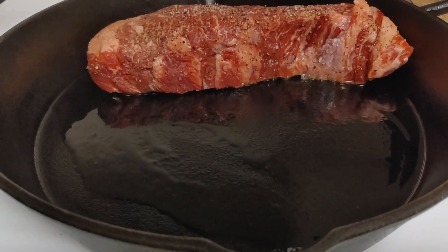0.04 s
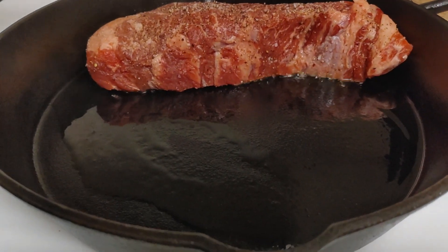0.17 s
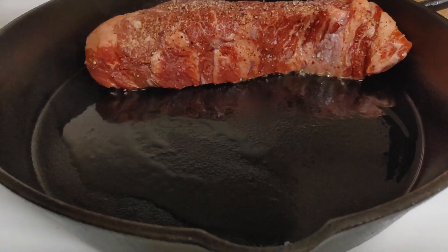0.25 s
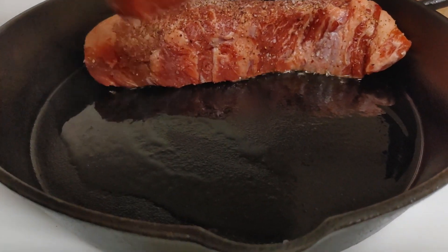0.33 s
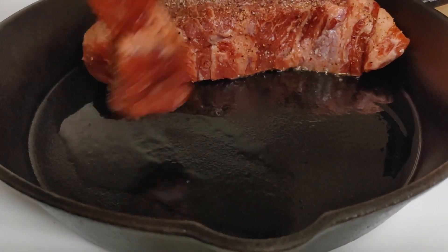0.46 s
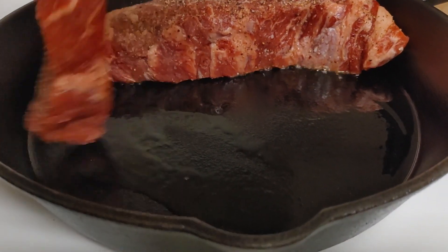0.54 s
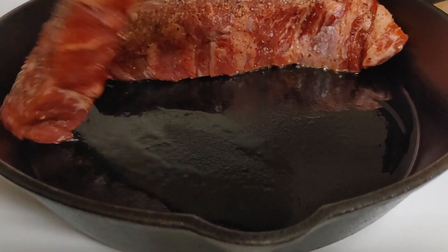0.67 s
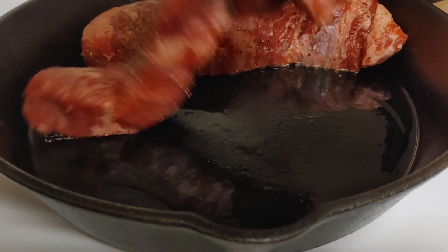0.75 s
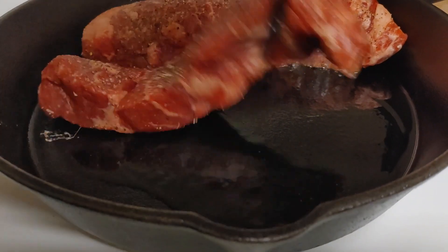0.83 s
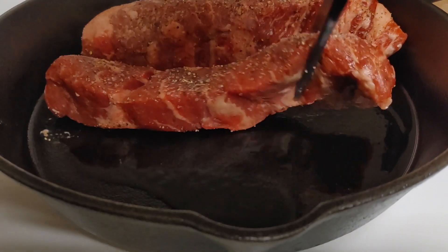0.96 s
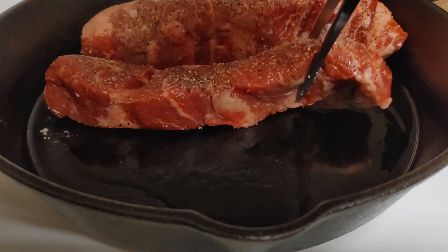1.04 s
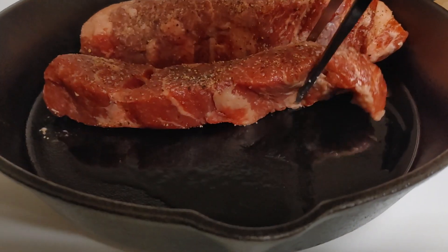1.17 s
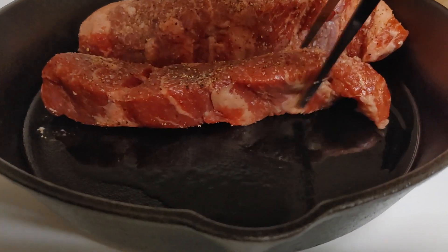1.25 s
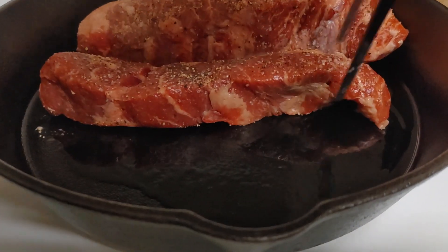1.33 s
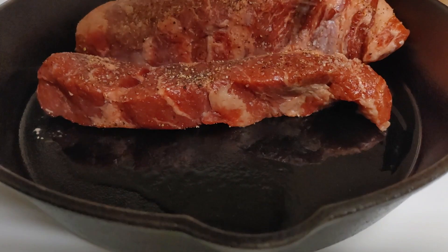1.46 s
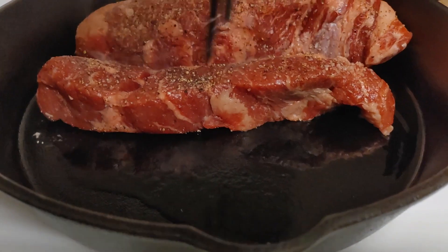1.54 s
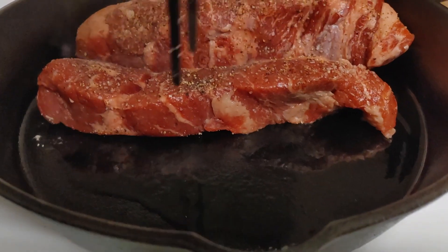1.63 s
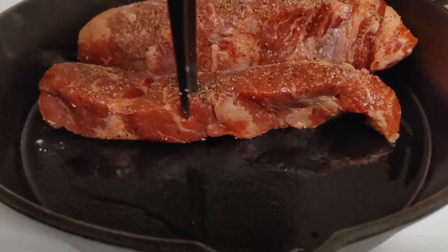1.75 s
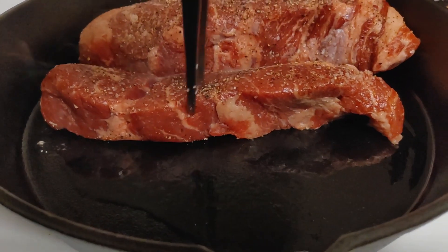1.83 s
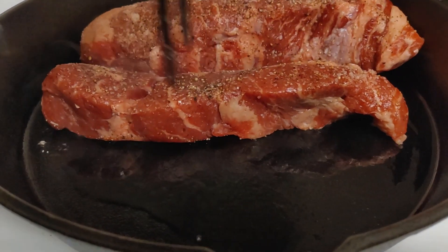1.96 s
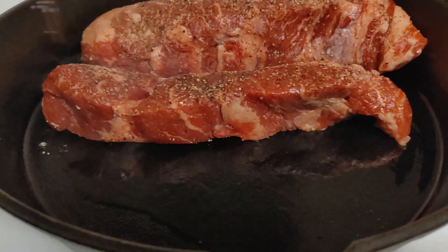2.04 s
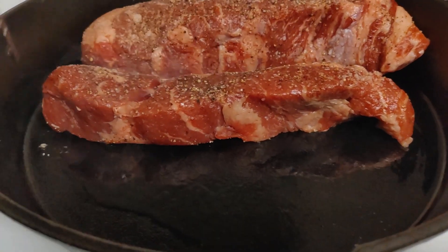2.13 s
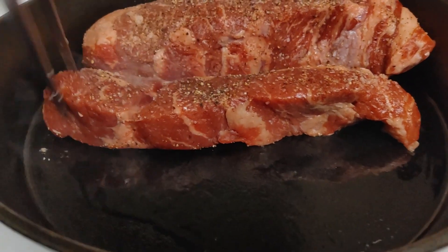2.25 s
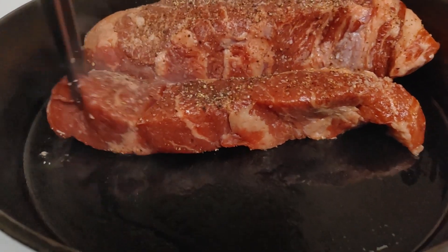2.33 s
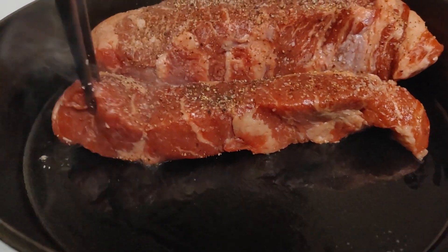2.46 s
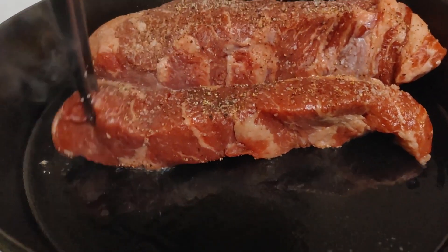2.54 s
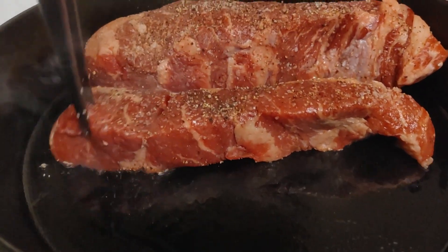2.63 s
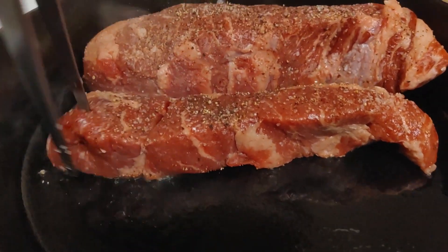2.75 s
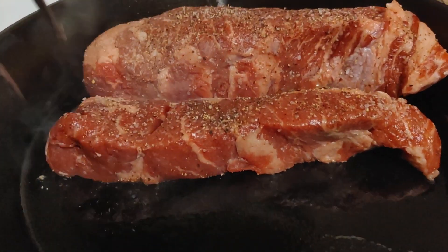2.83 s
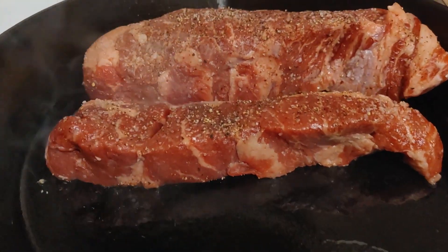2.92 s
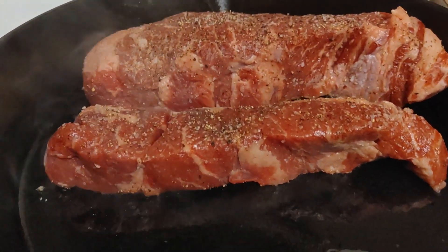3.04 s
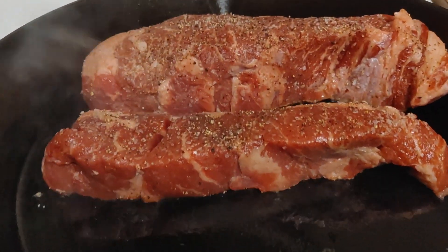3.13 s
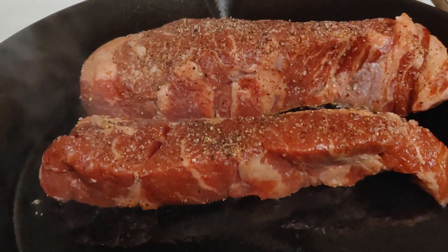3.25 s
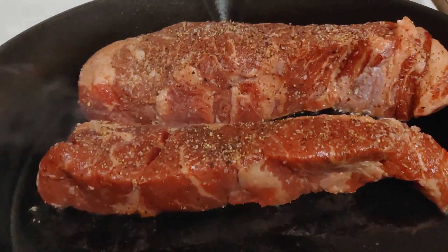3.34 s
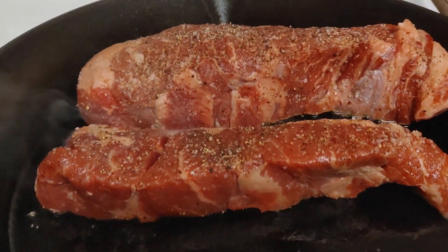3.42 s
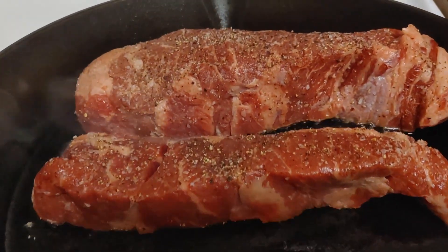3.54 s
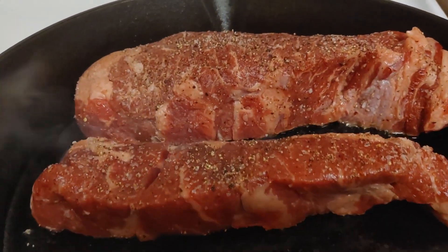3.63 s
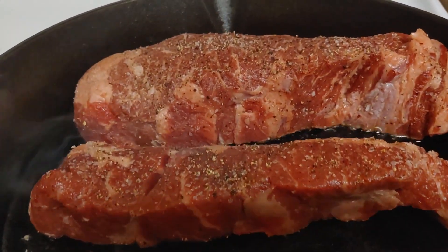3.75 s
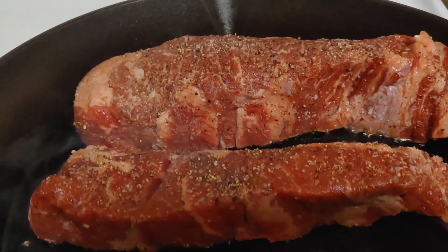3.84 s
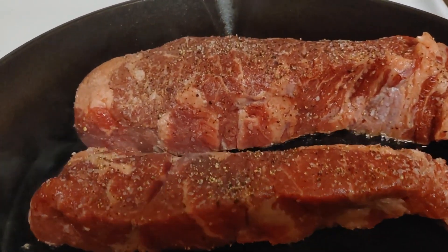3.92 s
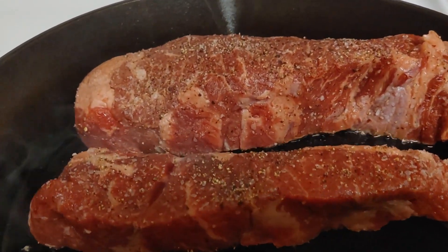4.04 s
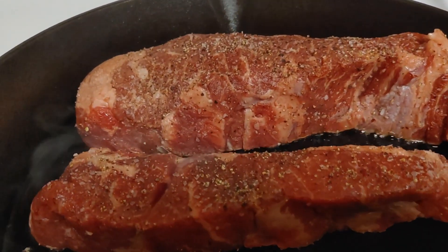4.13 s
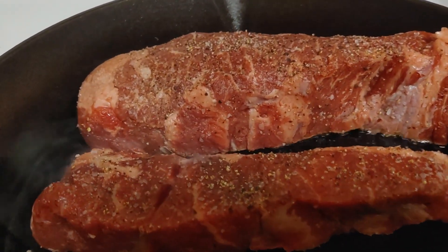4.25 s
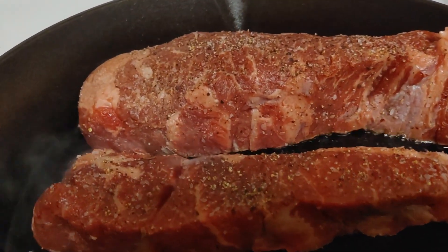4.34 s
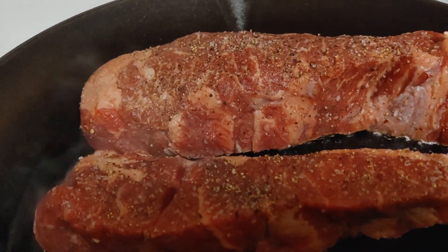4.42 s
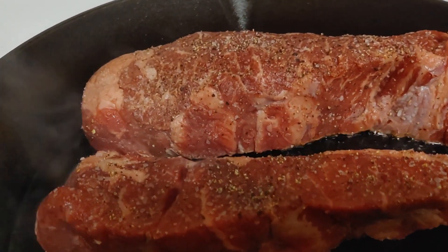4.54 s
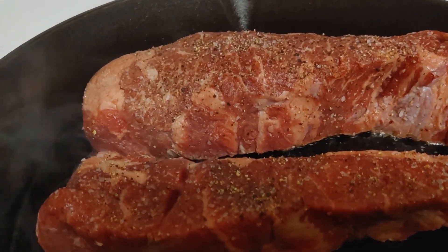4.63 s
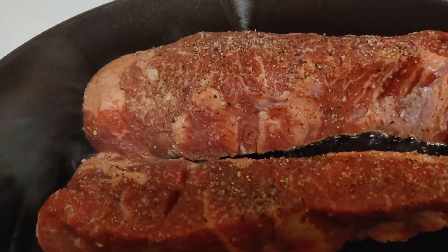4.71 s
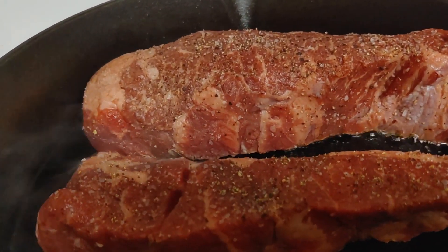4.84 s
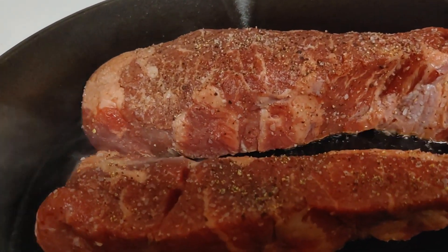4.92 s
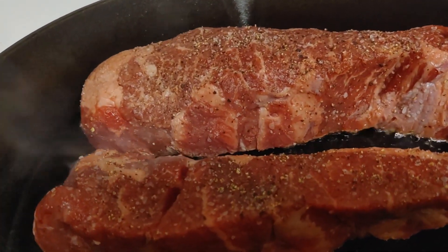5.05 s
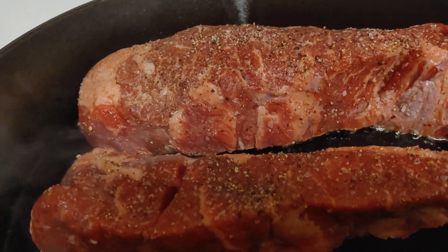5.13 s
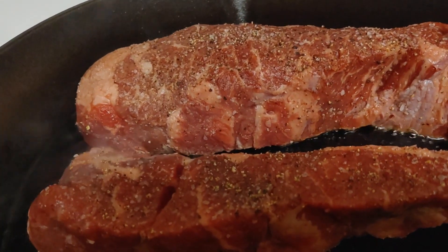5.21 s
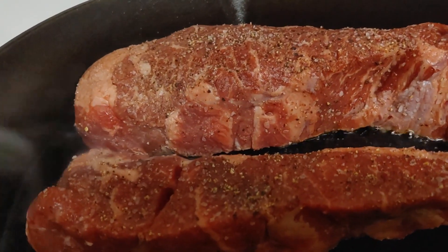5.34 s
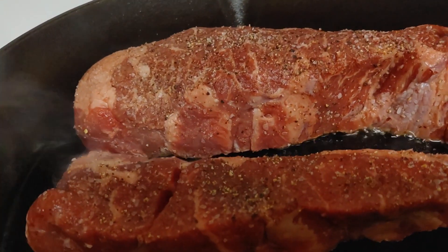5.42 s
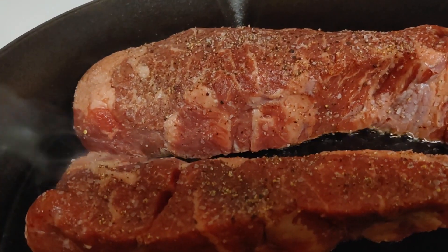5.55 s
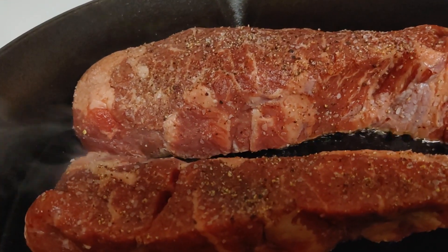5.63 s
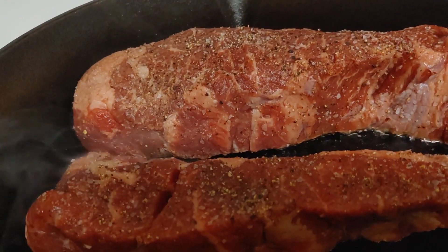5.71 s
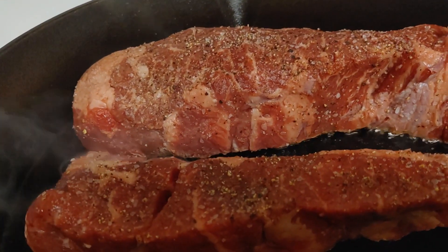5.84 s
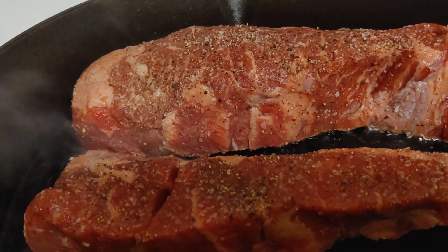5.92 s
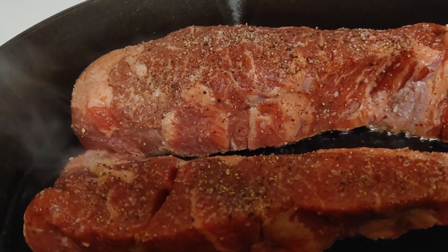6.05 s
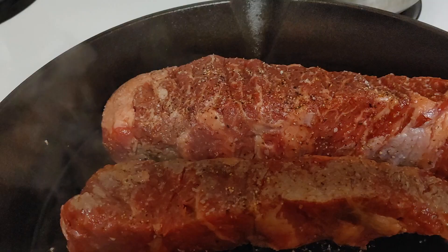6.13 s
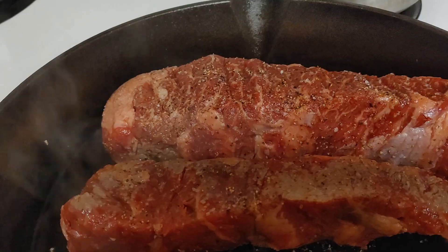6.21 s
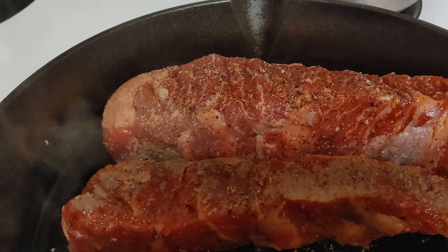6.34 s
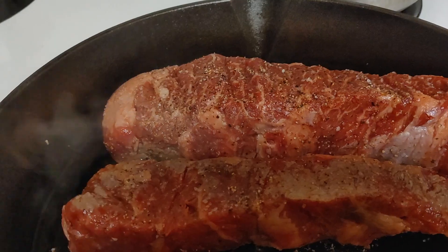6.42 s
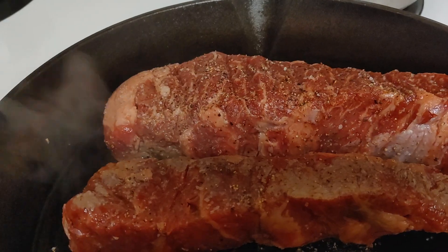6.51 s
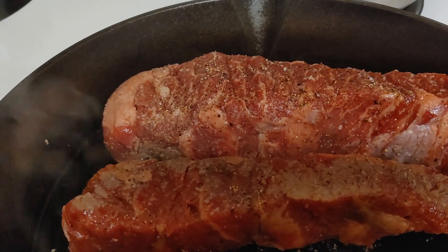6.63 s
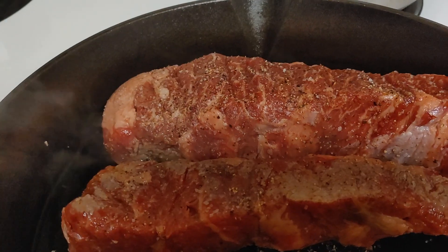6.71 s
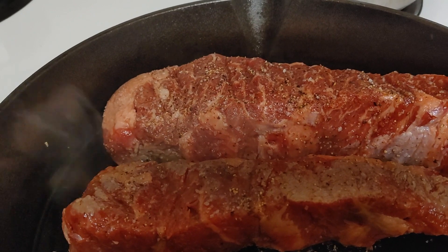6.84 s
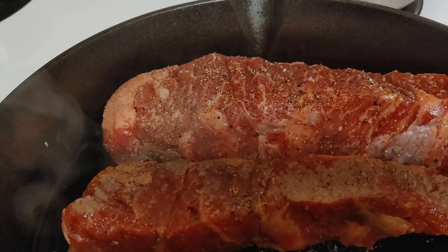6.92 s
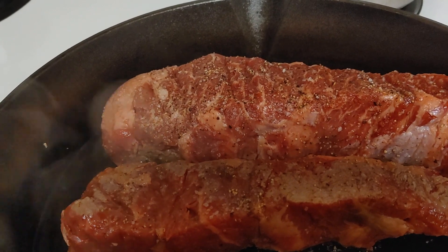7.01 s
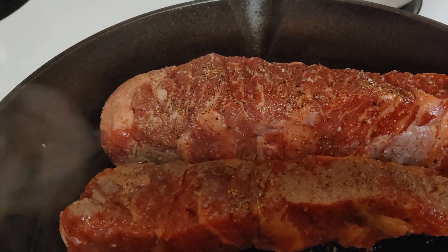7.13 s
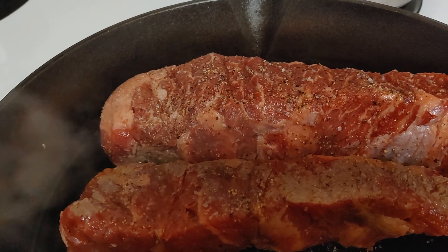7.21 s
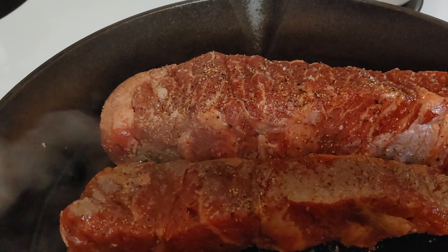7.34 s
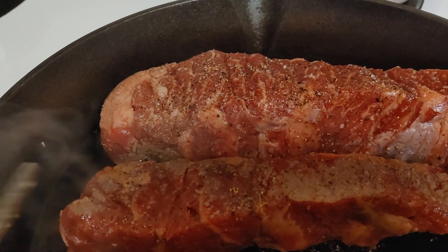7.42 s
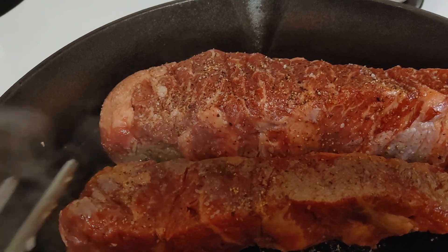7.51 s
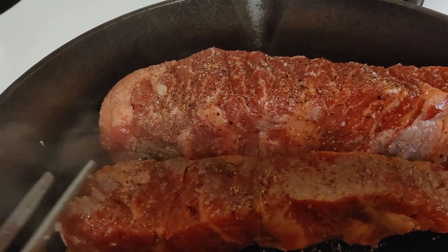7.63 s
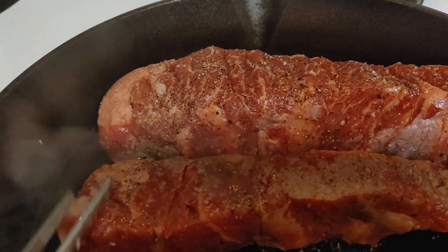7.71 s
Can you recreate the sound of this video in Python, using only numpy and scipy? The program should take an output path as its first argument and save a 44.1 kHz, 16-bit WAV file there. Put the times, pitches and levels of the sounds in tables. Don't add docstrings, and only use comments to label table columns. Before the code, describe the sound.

Close stereo sound of meat frying in an iron pan. A moderate, bright hiss swells within about a second as a second strip touches the oil, then stays dense and loud with sharp snaps, spits and soft low thumps jumping between left and right. Just after six seconds it stops abruptly, and a much quieter, coarser sizzle follows with small crackles. Faint kitchen rumble lies beneath.

```python
import sys
import numpy as np
from scipy import signal
from scipy.fft import rfft, irfft, next_fast_len
from scipy.io import wavfile
from scipy.ndimage import uniform_filter1d, minimum_filter1d, map_coordinates

SR = 44100
rng = np.random.default_rng(int(sys.argv[2]) if len(sys.argv) > 2 else 0)


def wav_record(signal):
    frames = np.transpose(np.atleast_2d(signal))
    bounded = np.clip(frames, -1, 1)
    quanta = np.round(bounded * 32767).astype(np.int16)
    wavfile.write(sys.argv[1], SR, quanta)


def voltage_ratio(decibels):
    exponent = np.asarray(decibels, float) / 20
    return 10 ** exponent


N = 342651
NOW = np.arange(N) / SR
RESUME_S = 6.2318

# (time [s], vigour [dB], coarseness [dB], place left-right [dB])
BOIL = [(0, -26, -0.5, -1.5), (.74, -25.5, -1, -3.5), (.93, -23.5, 1, -2), (1.1, -20.5, -2.5, -1.5),
        (1.3, -19, -1.5, -2), (1.55, -18.5, -2, -1), (1.85, -17.5, -1, -1), (2.2, -18, -0.5, -2.5),
        (2.8, -18, -0.5, -2.5), (3.25, -19, 0, -2.5), (4.0, -19.5, 0.5, -3.5), (4.8, -20, 1.5, -4),
        (6.16, -20, 0, -3), (6.24, -37, 1.5, -0.5), (6.41, -30, 2, .5), (6.7, -31, 1, 0),
        (7.0, -31, 4, -1.5), (7.77, -31.5, 5.5, -1.5)]


def oil():
    # (frequency [Hz], level per Hz [dB])
    fizz_tone = [(3000, -37), (5000, -15), (6000, -3.5), (7000, -2.5), (8600, -1), (9700, -4.5),
                 (11600, -0.5), (12400, -4.5), (12900, -4), (14000, -4.5), (15800, -7), (16000, -78)]
    sputter_tone = [(1200, -54), (2100, -15), (2800, -4), (3500, -4), (3850, -0.5), (4400, -1.5),
                    (5300, -5), (6200, -12.5), (8000, -16)]
    burble_tone = [(25, -58), (120, -41), (200, -22.5), (350, -21), (550, -8), (1000, -3.5), (1450, -1),
                   (1900, -5.5), (2500, -4), (4000, -50)]
    # (frequency [Hz], gain [dB])
    calm_tone = [(200, 3), (450, -8.5), (800, -2), (1300, 2), (2000, 3)]
    touch_s, touch_length_s = 0.85, 0.1
    fresh_db, fresh_s = 3, 0.35

    vigour_db, coarse_db, place_db = curves(BOIL)
    fine = bursting(count=9000, spread_db=0.5, life_s=0.00022)
    coarse = bursting(count=2500, spread_db=2, life_s=0.00082)
    spit = bursting(count=700, spread_db=1.5, life_s=0.0005)

    fizz = sizzle(fizz_tone, 0.85 * fine + 0.15 * spit, share=0.2, patchy_db=0.47, own_db=-0.5)
    fizz = lean(place_db + 1.4) * fizz

    sputter = sizzle(sputter_tone, (fine + coarse + spit) / 3, share=0.27, patchy_db=0.42, own_db=-1.0)
    sputter = voltage_ratio(-5 + coarse_db + 0.22 * wobble(6.5)) * lean(place_db + 0.04) * sputter

    burble_db = -19 + 0.15 * coarse_db + 7 * (NOW > RESUME_S)
    burble = sizzle(burble_tone, coarse, share=0.26, patchy_db=1.0, own_db=0.85)
    burble = voltage_ratio(burble_db + 0.75 * wobble(6.5)) * burble
    since_touch = NOW - touch_s
    calm = np.clip(1 - since_touch / touch_length_s, 0, 1)
    burble = burble * voltage_ratio(fresh_db * (1 - calm) * np.exp(-since_touch.clip(0) / fresh_s))
    calm_burble = filtered(burble, lambda hz: voltage_ratio(along(calm_tone, hz)))
    burble = burble + calm * (calm_burble - burble)

    surge_db = 0.16 * wobble(14) + 0.31 * wobble(60) + 0.28 * wobble(5.9)
    return voltage_ratio(vigour_db + 0.5 + surge_db) * flares() * (fizz + sputter + burble)


def sizzle(spectrum, bursts, share, patchy_db, own_db):
    # (frequency [Hz], difference [dB])
    side_tilt = [(300, 1), (1300, 1), (2400, 0), (4000, -2), (6000, -1), (8000, -0.5), (12000, 2),
                 (15000, 0.5)]
    # (frequency [Hz], correlation [0-1])
    likeness = [(150, 0.21), (700, 0.95), (1200, 0.52), (2000, 0.3), (4000, 0.19), (12000, 0.051)]
    z = signal.stft(rng.standard_normal((2, N)), nperseg=256)[2]
    patches = uniform_filter1d(rng.standard_normal(z.shape[1:]), 5, 0)
    patches = unit(uniform_filter1d(patches, 5, 1))
    noise = signal.istft(z * voltage_ratio(patchy_db * patches), nperseg=256)[1][:, :N]
    pair = noise * np.sqrt(1 - share + share * bursts)

    def mid_side(hz):
        turn = np.arccos(np.clip(along(likeness, hz), -1, 1)) / 2
        return voltage_ratio(along(spectrum, hz)) * [np.cos(turn), np.sin(turn)]

    mid, side = filtered(pair, mid_side)
    both = filtered(np.array([mid + side, mid - side]), lambda hz: lean(along(side_tilt, hz)))
    return unit(both) * voltage_ratio(own_db * np.array([wobble(25), wobble(25)]))


def bursting(count, spread_db, life_s):
    start = rng.integers(0, N, count)
    power = voltage_ratio(2 * spread_db * rng.exponential(1, count).clip(0, 4))
    t = np.arange(-200, 201) / SR
    burst = np.exp(-2 * np.abs(t) / life_s)
    train = signal.fftconvolve(np.bincount(start, power, N), burst, "same")
    return np.abs(train) / np.mean(train)


def flares():
    # (time [s], rise [dB])
    flare_ups = [(0.335, 3), (0.715, 1.5), (1.8, 1), (2.72, 1.5), (2.91, 0.5), (3.645, 3), (3.86, 3),
                 (4.385, 3), (5.333, 2.5), (5.736, 3), (6.08, 1.5), (6.415, 1.5), (7.075, 0.5)]
    half_width_s = 0.0052
    db = np.zeros(N)
    for s, rise_db in flare_ups:
        middle = round(s * SR)
        near = slice(middle - 1500, middle + 1500)
        db[near] += rise_db * np.exp(-0.5 * ((NOW[near] - s) / half_width_s) ** 2)
    return voltage_ratio(db)


def snaps():
    # (time [s], left peak [dB], right peak [dB], pitch [Hz])
    big_bubbles = [(0.1147, -12, -6, 7000), (0.3267, -7, -17, 7200), (0.3339, -11, 1, 8040),
                   (0.7125, -4, -8, 3280), (1.7985, 2, -11, 10100), (2.1046, -5, -2, 7000),
                   (2.2539, -6, -7, 6300), (2.6212, -2, 6, 6900), (2.712, 1, 2, 6100),
                   (3.0008, -4, 5, 6900), (3.2268, -4, -4, 8000), (3.3337, -3, -5, 7400),
                   (3.644, -5, 0, 7470), (3.8606, -2, 0, 7700), (4.3963, -8, -6, 8100),
                   (4.6138, -12, -3, 8800), (4.7552, -9, -2, 3800), (5.286, -2, -6, 6300),
                   (5.3274, 1, 4, 4540), (5.4446, -4.5, -5, 5240), (5.5211, -7, 1, 9300),
                   (5.7324, -9, 4, 6340), (6.0323, -6, -5, 5940), (6.076, -3, 2, 4600),
                   (6.1236, -5, -10, 7700), (6.423, -11, -13, 7500), (6.99, -14, -12, 4930),
                   (7.0715, -11, -10, 7900), (7.463, -11, -10, 4840), (7.6476, -15, -16, 5050)]
    s, left_db, right_db, hz = np.vstack([big_bubbles, middling(count=150)]).T
    t = np.arange(96) / SR
    swell = np.exp(-0.5 * ((t - 0.0009) / 0.0002) ** 2)
    start = np.round(s * SR).astype(int) - 40
    sides = []
    for db in (left_db, right_db):
        chance = rng.standard_normal((len(s), 97))
        phase = 3 * chance[:, :1]
        tone = np.sin(2 * np.pi * hz[:, None] * t + phase)
        crack = 0.6 * tone + 0.6 * chance[:, 1:]
        sides.append(scatter(start, voltage_ratio(db + 1.5)[:, None] * swell * crack))

    def thin_and_bright(f):
        bass_cut = (f / 2500) ** 2 / (1 + (f / 2500) ** 2)
        return bass_cut / (1 + (f / 12600) ** 30)

    return filtered(np.array(sides), thin_and_bright)


def middling(count):
    when = rng.random(count)
    chance = rng.standard_normal((count, 3))
    peak_db = curves(BOIL)[0][(when * N).astype(int)] + 10
    sides_db = peak_db + 2.5 * chance[:, :2].T.clip(-2, 1.5)
    pitch_hz = 8000 * np.exp(0.294 * chance[:, 2].clip(-2, 1.3))
    return np.transpose([0.01 + when * (N / SR - 0.02), *sides_db, pitch_hz])


def jolts():
    # (time [s], level [dB], sharpness [dB])
    left_rows = [(0.499, -42, 6), (1.4868, -28, 12), (1.7995, -31, -2), (2.0933, -26.5, 7),
                 (2.6148, -35, 9), (2.6209, -28, 10), (2.721, -31, 11), (2.8073, -29.5, 3), (2.905, -38, 8),
                 (2.9194, -31, 10), (3.1747, -26, 8), (3.643, -36, 12), (4.5324, -27.5, -6),
                 (4.793, -26, 2), (5.0264, -24.5, 1), (5.089, -37, 12), (5.2864, -27.5, 2),
                 (5.3402, -27, 10), (5.4449, -20, 9.5), (5.9545, -28, 12), (2.974, -41, 12),
                 (6.2345, -38, -3.5), (6.9225, -41, 6), (6.4115, -37.5, -1), (6.5108, -37.5, -5),
                 (6.6057, -41, 11), (7.3877, -41, 9), (7.447, -39, 12), (7.4628, -38, -2),
                 (7.5262, -30.5, -1)]
    right_rows = [(0.3268, -37, 12), (1.7995, -32, -16), (1.8512, -42, 12), (2.1995, -31, 2),
                  (2.2371, -31, 14), (2.6209, -30, 13), (2.7121, -15.5, 11), (2.8078, -32, 5),
                  (2.9702, -33, 12), (3.0016, -20.5, 12), (3.1747, -36, 9), (3.227, -25.5, 0),
                  (3.249, -32, 12), (3.584, -37, 12), (3.6204, -39, 12), (3.643, -33.5, 12),
                  (3.86, -39, 11), (4.0873, -31.5, 5), (4.112, -39, 11), (4.122, -37, 4), (4.2087, -42, 12),
                  (4.4098, -35, 12), (5.2864, -31.5, 5), (5.3279, -16, 14), (5.3681, -35, 4),
                  (5.521, -34, 12), (5.905, -33.5, 11), (5.9298, -38, 12), (5.9535, -29, 12),
                  (6.0319, -19, 12)]
    left = thumps(left_rows) + thumps(stray(count=16))
    right = thumps(right_rows) + thumps(stray(count=16))
    across = voltage_ratio(-23)
    both = np.array([left + across * right, right + across * left])
    return filtered(both, lambda hz: -hz ** 2 / (160 ** 2 - hz ** 2 + 1j * hz * 400))


def thumps(rows):
    s, db, sharp_db = np.transpose(rows)
    t = np.arange(-64, 64) / SR
    width_s = 0.00005 * voltage_ratio(-1.1 * (sharp_db[:, None].clip(0, 12) - 10))
    pulse = np.exp(-0.5 * (t / width_s) ** 2)
    pulse = pulse / pulse.sum(axis=1, keepdims=True)
    way = np.sign(rng.standard_normal(len(s)))
    return scatter(np.round(s * SR).astype(int) - 70, (way * voltage_ratio(db + 35))[:, None] * pulse)


def stray(count):
    when, size = rng.random((count, 2)).T
    vigour_db = curves(BOIL)[0][(when * N).astype(int)]
    level_db = vigour_db - 31 - 1.5 * np.log(size)
    return np.transpose([0.01 + when * (N / SR - 0.02), level_db, np.full(count, 8)])


def room():
    # (frequency [Hz], level per Hz [dB])
    rumble_tone = [(20, -34), (40, -17), (65, -1), (90, -5.5), (125, -13), (220, -2.5), (330, -23),
                   (600, -43)]
    rumble = filtered(rng.standard_normal((2, N)), lambda hz: voltage_ratio(along(rumble_tone, hz)))
    return voltage_ratio(-78 + 6.1 * np.array([wobble(5.6), wobble(9.6)])) * unit(rumble)


def unit(x):
    return x / np.sqrt(np.mean(x ** 2) + 1e-20)


def lean(db):
    return voltage_ratio(np.outer([0.5, -0.5], db))


def along(points, hz):
    f, v = np.transpose(points)
    return np.interp(np.log(hz + 1), np.log(f + 1), v)


def curves(rows):
    s, *columns = np.transpose(rows)
    return [np.interp(NOW, s, c) for c in columns]


def wobble(rate):
    knots = rng.standard_normal(int(N * rate / SR) + 4)
    return map_coordinates(knots, [np.arange(N) * rate / SR])


def filtered(x, response):
    m = next_fast_len(N + 8192)
    return irfft(rfft(x, m) * response(np.fft.rfftfreq(m, 1 / SR)), m)[..., :N]


def scatter(start, shapes):
    at = start[:, None] + np.arange(shapes.shape[1])
    return np.bincount(at.ravel(), shapes.ravel(), N + shapes.shape[1])[:N]


def scene():
    pan = oil() + snaps() + jolts() + room()
    return filtered(pan, lambda hz: hz ** 2 / np.sqrt(hz ** 4 + 52 ** 4))


def limited(x, top):
    need = np.minimum(1, top / (np.abs(x) + 1e-9))
    need = minimum_filter1d(need, size=64, axis=1)
    return x * uniform_filter1d(need, size=32, axis=1)


def thinned(x, starved):
    # (frequency [Hz], share of time dropped [0-1])
    gaps = [(130, .25), (320, 0), (12400, 0), (12700, .62), (13500, .62), (13900, .3), (15200, .15),
            (15650, .22), (15850, 1)]
    # (frequency [Hz], share of its neighbours [ratio])
    weakest = [(60, 1.1), (120, 1.4), (200, .9), (400, .3), (2000, .5), (12000, .5), (12600, 1.8),
               (16000, 1.8)]
    hz, s, z = signal.stft(x, SR, nperseg=2048)
    size = np.abs(z)
    band = np.arange(len(hz)) // 20
    luck = uniform_filter1d(rng.standard_normal((band[-1] + 1, len(s))), size=2, axis=1)
    luck = unit(luck + 0.7 * np.roll(luck, 1, axis=0))
    luck = 0.5 + 0.5 * np.tanh(0.85 * luck)
    later_treble = (s > RESUME_S) & (hz[:, None] > SR / 8)
    odds = along(gaps, hz)[:, None] ** np.where(later_treble, starved, 1)
    usual = uniform_filter1d(uniform_filter1d(size, size=12, axis=1), size=5, axis=2)
    low_pops = (size > 1.3 * usual) & (band == 0)[:, None]
    kept = (luck[band] >= odds) | low_pops
    kept = kept & (size > along(weakest, hz)[:, None] * usual)
    return signal.istft(z * kept, SR, nperseg=2048)[1][:, :N]


def cut():
    stop_s, scrap_s, scrap_length_s = 6.166, 0.0107, 0.005
    since = (NOW - stop_s).clip(0)
    phase = since % scrap_s
    scraps = voltage_ratio(-12 - 2600 * phase)
    scraps = scraps * (phase < scrap_length_s) * (since < 2 * scrap_s)
    return np.where(NOW < stop_s, 1, scraps)


def late(x):
    return np.array([x[0], np.roll(x[1], 180)])


def low_pass(x):
    return signal.sosfilt(signal.butter(12, 16440, fs=SR, output="sos"), x)


def record(dry):
    # (frequency [Hz], gain [dB])
    later_tone = [(150, 5), (550, -1), (1500, 2), (3000, -0.5), (4200, 3.5), (6000, 4.5), (9500, -1),
                  (12000, 3), (13200, -8), (15000, 2)]
    second = NOW >= RESUME_S
    since = NOW - RESUME_S
    dry = thinned(limited(dry, top=0.84), starved=0.5)
    after = filtered(dry, lambda hz: voltage_ratio(along(later_tone, hz)))
    after = after * (1 + 0.9 * np.exp(-np.abs(since) / 0.003))
    after = after * np.clip(since / 0.0004, 0, 1)
    mix = late(dry * ~second) * cut() + late(after) * second
    return low_pass(mix)


dry = scene()
out = record(dry)
wav_record(out)
```